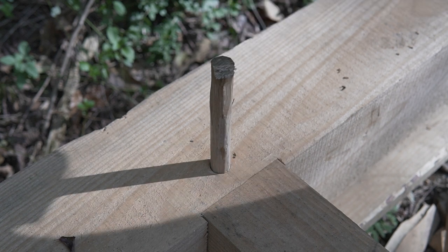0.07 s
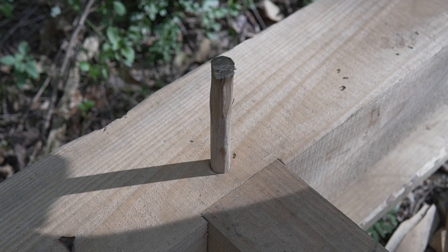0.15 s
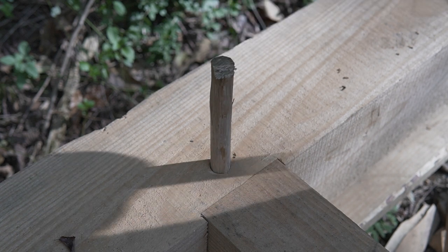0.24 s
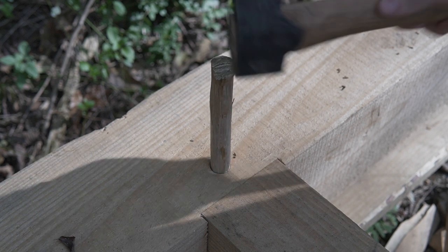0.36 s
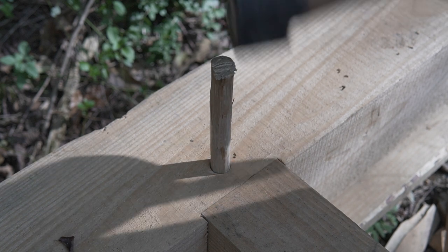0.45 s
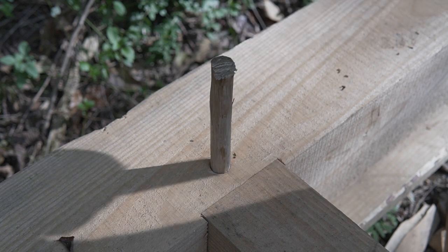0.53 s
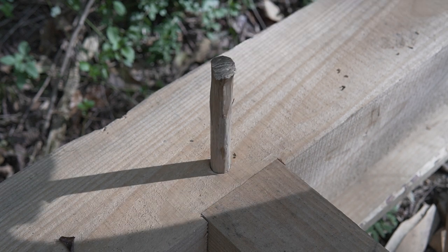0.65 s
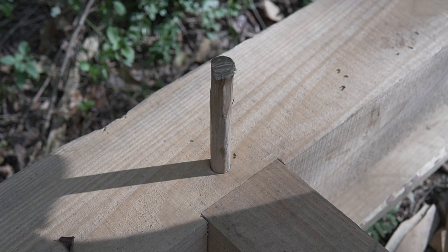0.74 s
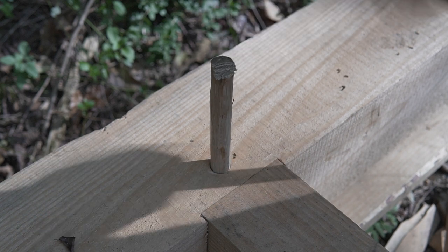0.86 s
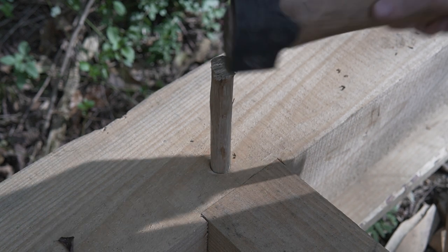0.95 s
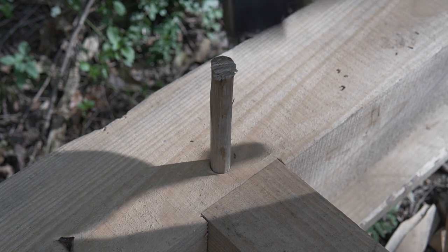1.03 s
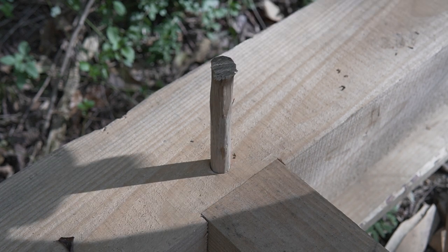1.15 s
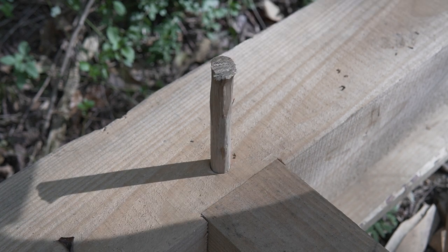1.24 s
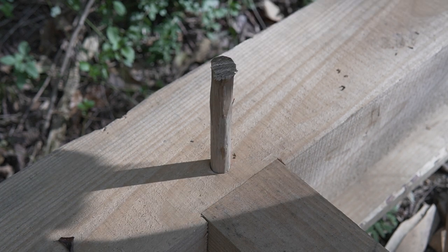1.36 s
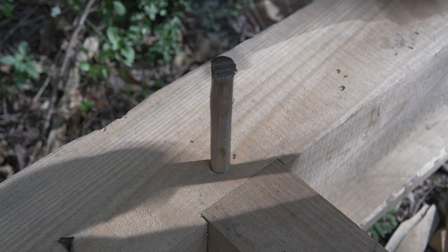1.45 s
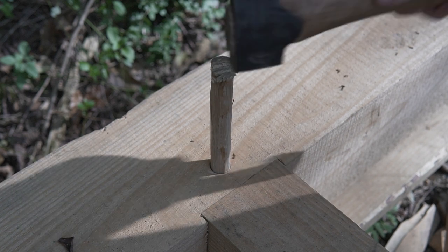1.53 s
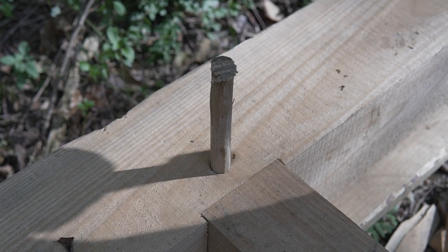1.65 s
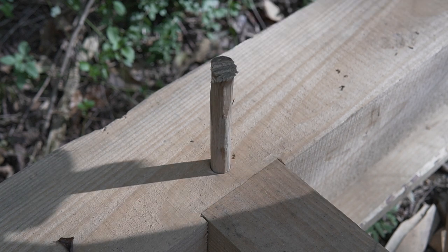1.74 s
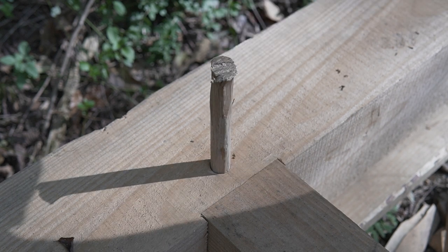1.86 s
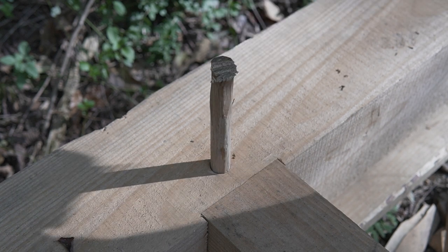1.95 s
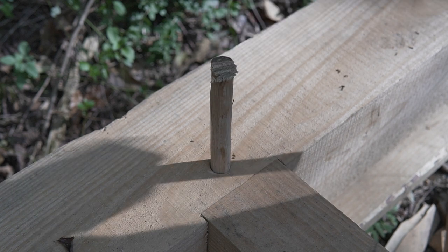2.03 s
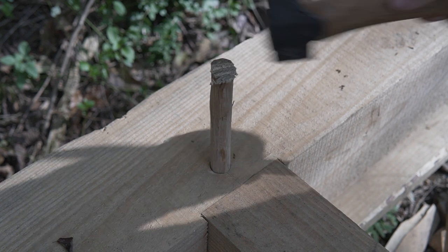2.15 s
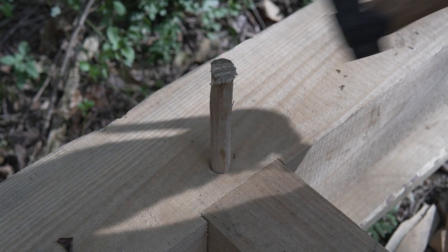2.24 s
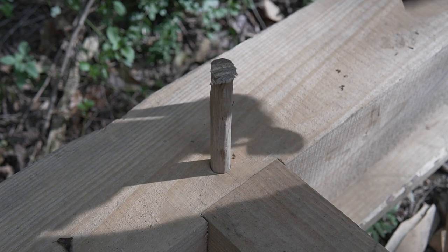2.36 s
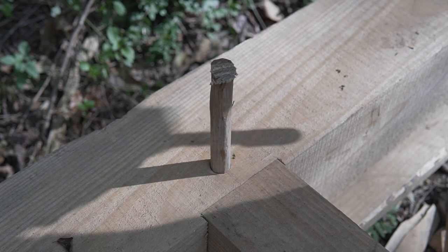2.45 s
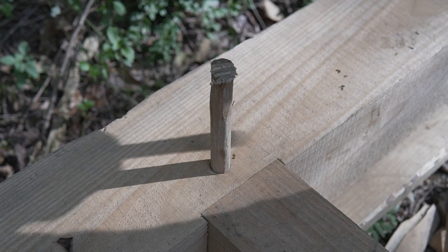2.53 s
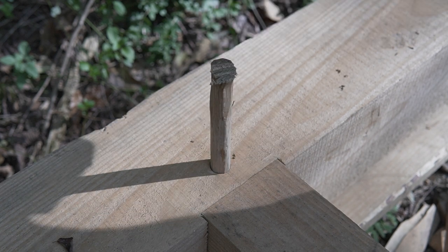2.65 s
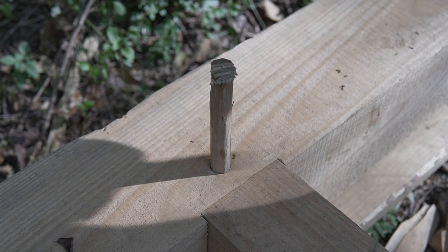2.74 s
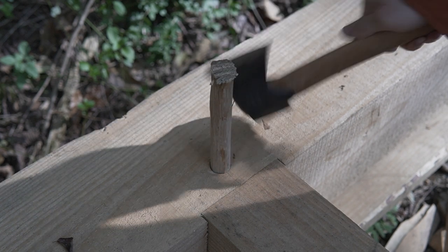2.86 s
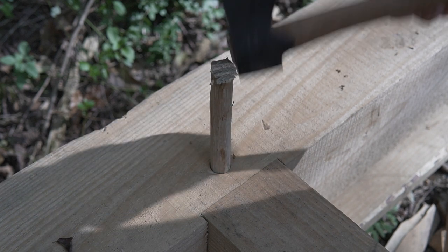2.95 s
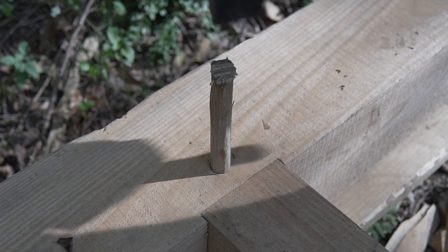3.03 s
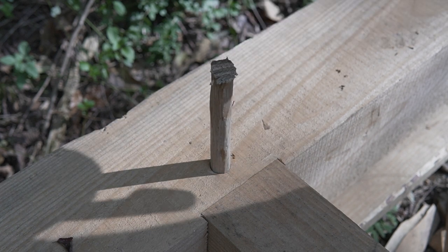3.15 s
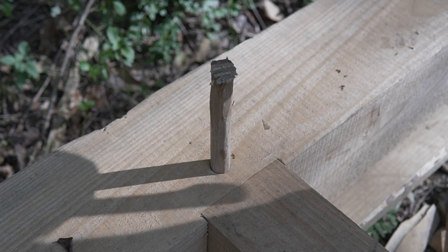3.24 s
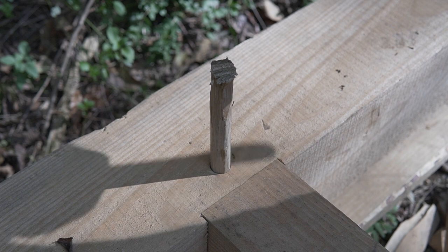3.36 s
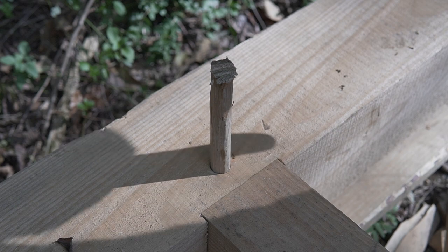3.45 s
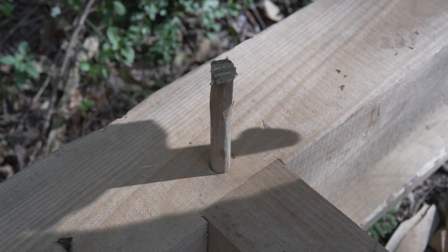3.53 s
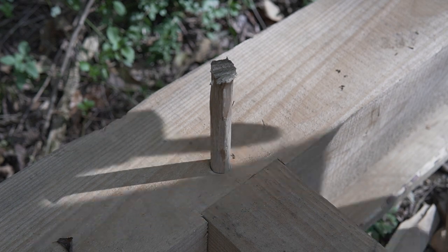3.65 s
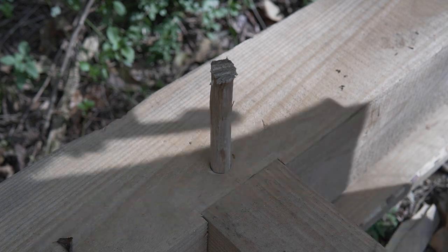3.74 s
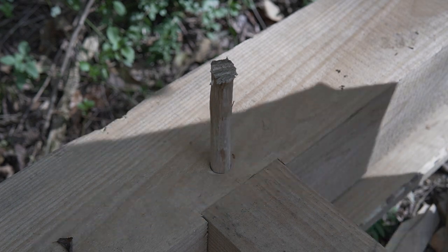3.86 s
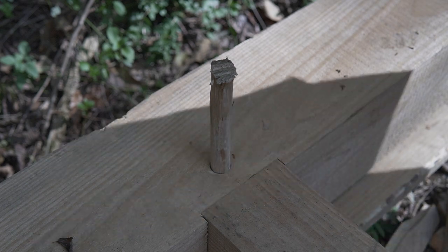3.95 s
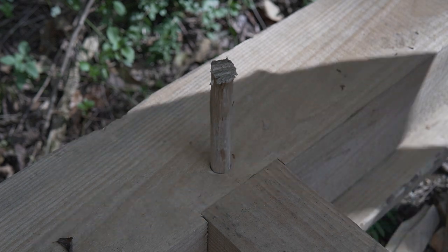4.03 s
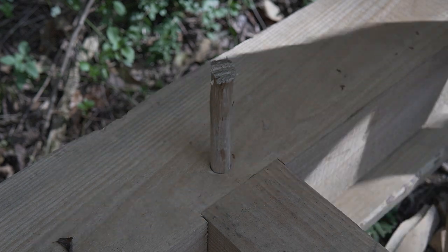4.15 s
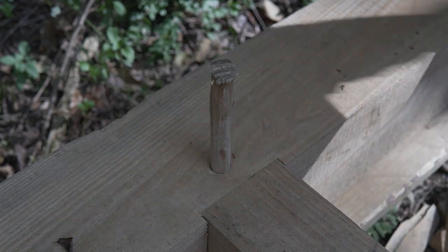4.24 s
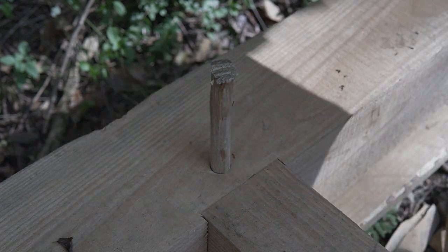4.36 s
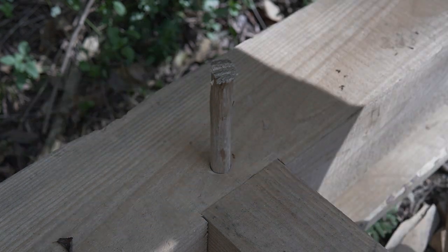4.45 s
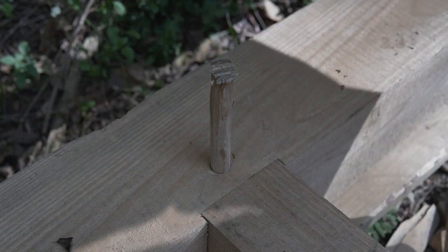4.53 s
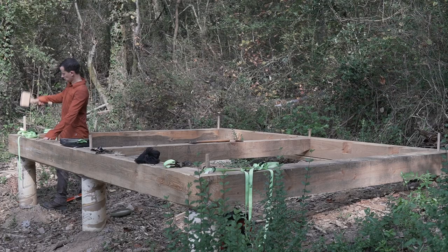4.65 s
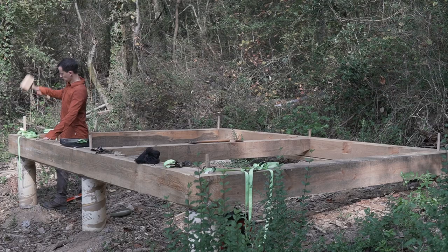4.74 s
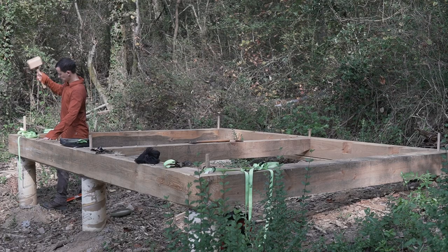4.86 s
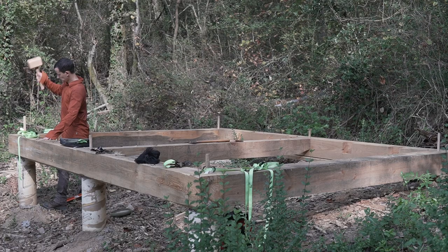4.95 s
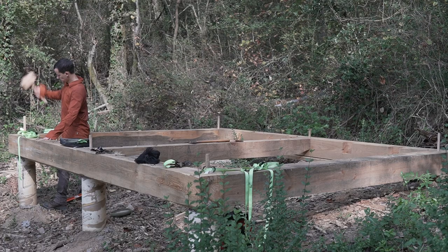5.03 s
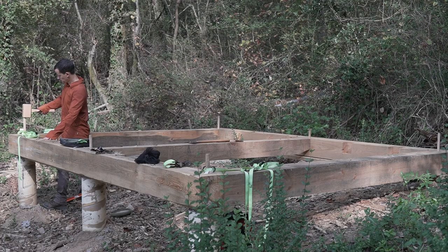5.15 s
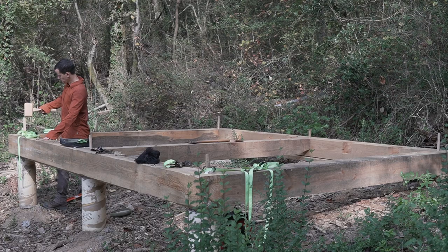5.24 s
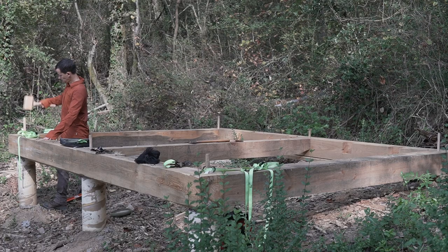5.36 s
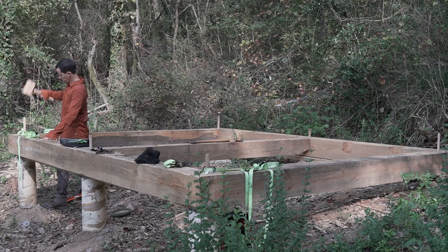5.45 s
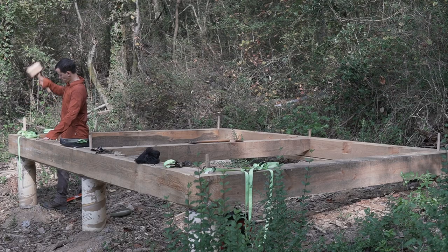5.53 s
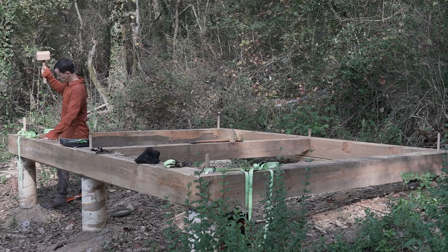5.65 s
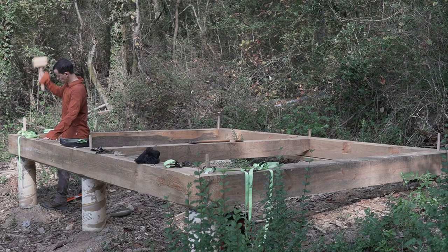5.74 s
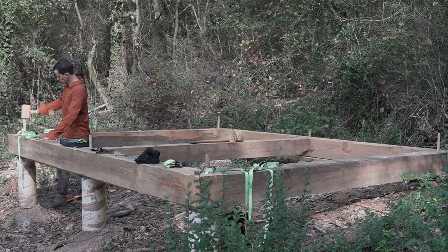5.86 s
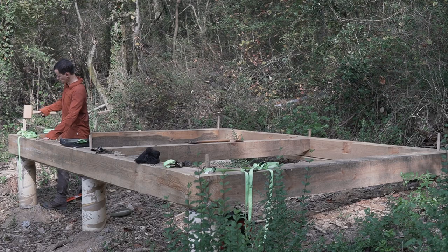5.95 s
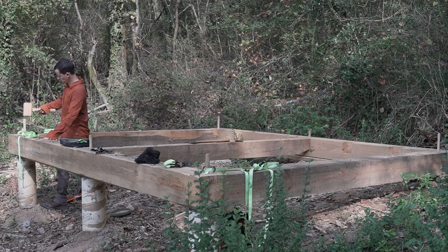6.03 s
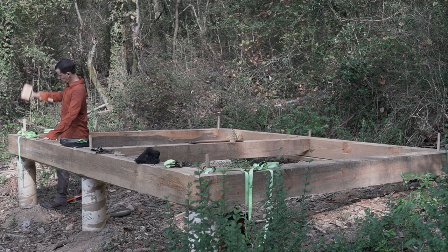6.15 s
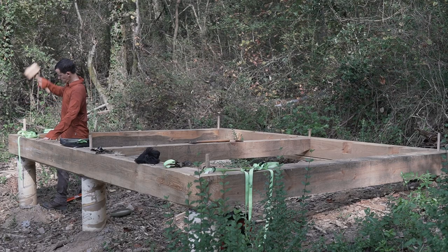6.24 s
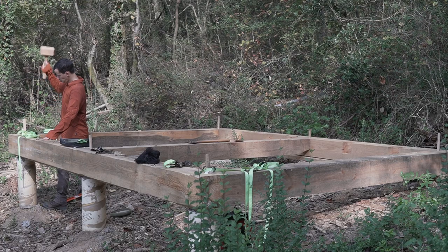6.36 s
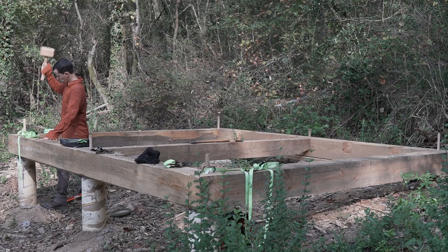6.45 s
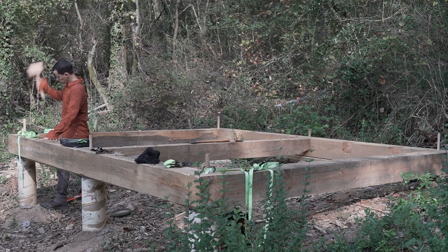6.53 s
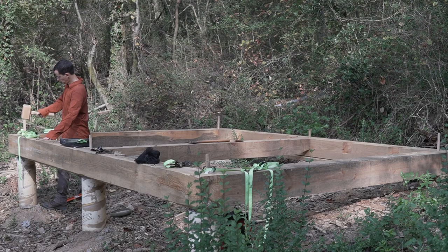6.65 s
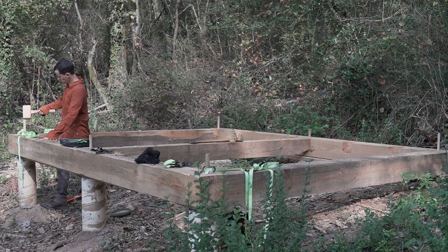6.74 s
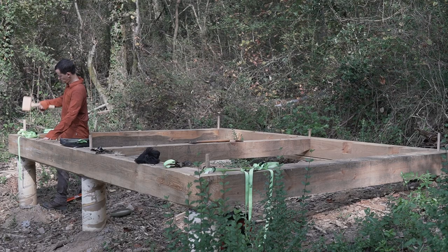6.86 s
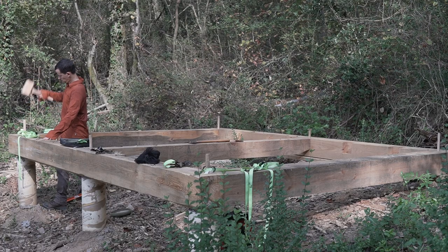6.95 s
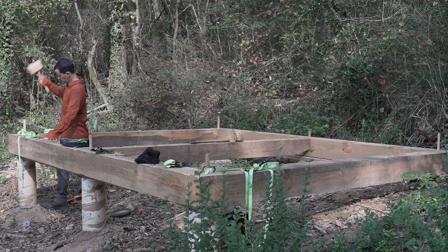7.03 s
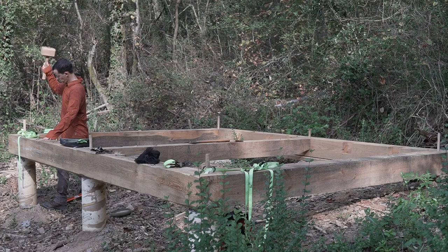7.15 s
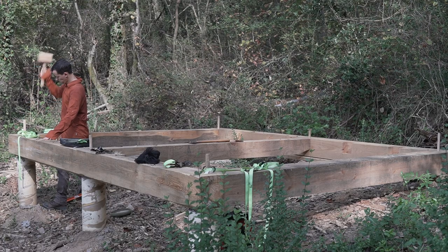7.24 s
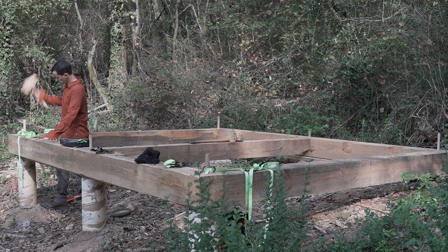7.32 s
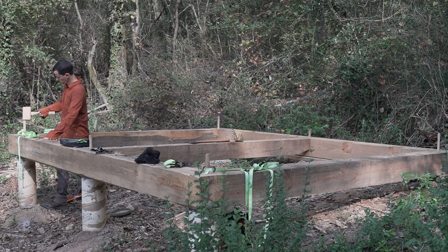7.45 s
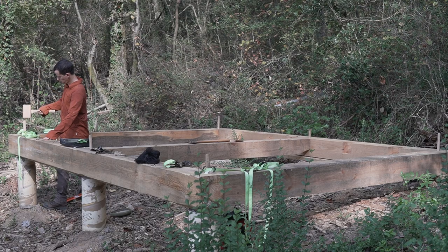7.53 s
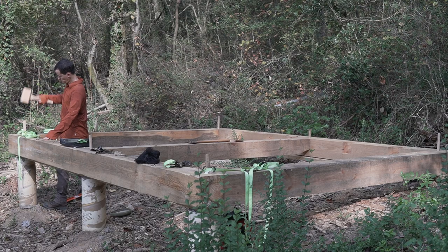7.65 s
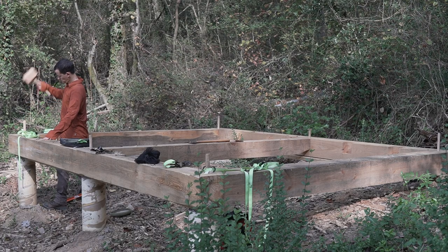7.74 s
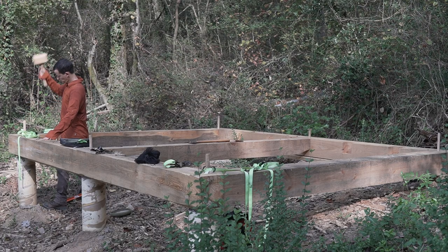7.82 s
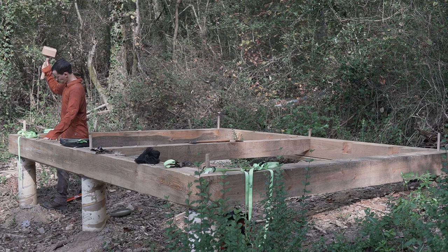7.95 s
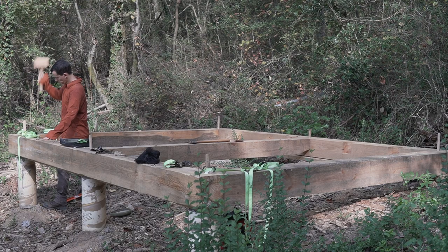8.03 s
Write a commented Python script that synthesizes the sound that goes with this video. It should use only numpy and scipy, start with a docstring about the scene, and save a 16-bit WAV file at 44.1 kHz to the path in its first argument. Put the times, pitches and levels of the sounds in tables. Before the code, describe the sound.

A mallet drives a wooden peg into a timber frame in the woods. Five loud blows land right by the microphone, each a sharp crack with a hollow boom from the beams and a short echo off the trees. Feet shift softly in dry leaves and snap a few twigs. Four more blows follow, slower and heard from across the site. Faint insects, soft air and a barely audible bird lie behind.

```python
"""A mallet drives a wooden peg into a timber frame in a wood: five blows right by the microphone,
then four from across the site. Each blow cracks, rings the peg or the mallet head, booms through
the beams and scatters back from the trees. The close blows overload the recorder and its limiter
ducks them. Between the two groups, feet shift in dry leaves; a bird, insects and air lie far behind."""
import sys
import numpy as np
from scipy import signal
from scipy.fft import rfft, irfft
from scipy.io import wavfile

SR = 44100
rng = np.random.default_rng(int(sys.argv[2]) if len(sys.argv) > 2 else 0)


def put_to_file(sound):
    """Save the sound as 16-bit audio at rate SR, in the file named by the first command-line argument."""
    columns = np.atleast_2d(sound).T  # one column per channel
    safe = np.clip(columns, -1, 1)
    whole_steps = np.round(safe * 32767)
    wavfile.write(sys.argv[1], SR, whole_steps.astype(np.int16))


N = 356769

# blows right by the microphone; the first falls before the start and only rings on:
# t/s, crack level/dB, peg level/dB, favoured peg f/Hz, beam level/dB, favoured beam f/Hz
NEAR_BLOWS = [(-0.27, 4, -2.5, 2000, 2, 300), (0.3372, -5, 1.5, 1131, 2, 307),
              (0.9226, -3, -11.5, 400, 3, 298.3), (1.4975, -8, -2, 349, 3.5, 298),
              (2.0911, 1, -0.5, 2914, 2, 272), (2.8615, -5.5, -3, 2710, -9.5, 338.5)]
# echo bands of the trees, heard from beside the peg: f/Hz, level/dB, t60/s
NEAR_ECHO_BANDS = [(100, -20.5, 1), (450, -14.5, 0.53), (1020, -22, 0.98), (2060, -16.5, 0.71),
                   (3400, -11.5, 0.68), (4870, -11, 0.65), (8000, -13, 0.38), (15000, -9, 0.12)]
def close_blows(echo_db=1, late_s=0.23):
    """At the microphone the mallet hits the peg, the beam under it booms and the wood answers."""
    out = np.zeros(N)
    for s, crack_db, peg_db, peg_hz, beam_db, beam_hz in NEAR_BLOWS:
        strike = peg_strike(crack_db, peg_db, peg_hz)
        beam = beam_boom(beam_hz, favour_db=5.5, octaves=0.18)
        echo = trees(strike, NEAR_ECHO_BANDS, rise_s=0.029, early_db=12, early_s=.09, patchy_db=0.73)
        add(out, s, strike)
        add(out, s, gain_of(beam_db) * swell(beam, rise_s=0.0011))
        add(out, s, gain_of(echo_db) * echo)
        add(out, s + late_s, late_echo(strike))
    return out


# the peg close up, its modes and the bands of its crack: f/Hz, level/dB, t60/s
PEG_MODES = [(299, 1, 0.075), (516, -1.5, 0.028), (899, 1.5, 0.038), (1179, 3, .04), (1158, 2, 0.052),
             (1360, -2.5, 0.017), (1480, 4, 0.014), (1860, 4.5, 0.015), (2157, 1.5, .03),
             (2640, 1.5, 0.0099), (3090, -4.5, 0.005)]
CRACK_BANDS = [(201, 9, 0.19), (625, 16.5, 0.11), (1210, 15.5, 0.064), (2200, 16.5, 0.037),
               (3250, 20.5, 0.042), (4444, 6, .03), (8500, 3.5, 0.016), (15000, -8.5, 0.012)]
def peg_strike(crack_db, peg_db, peg_hz, even_db=-3, tilt_per_db=0.58, dullest_tilt=-2.2):
    """The peg cracks and rings for an instant; a harder crack is brighter."""
    tilt = max(tilt_per_db * (crack_db - even_db), dullest_tilt)  # dB/octave
    strike = gain_of(peg_db) * timber(PEG_MODES, peg_hz, favour_db=7, octaves=.3)
    add(strike, 0, gain_of(crack_db) * burst(CRACK_BANDS, tilt))
    return strike


# the beam close up, its modes and the bands of its rattle: f/Hz, level/dB, t60/s
BEAM_MODES = [(24, -26, 1.3), (37.7, -40, 2.6), (73, -26.5, 0.41), (106, -26.5, 0.18), (142, -19.5, 0.32),
              (183, -18.5, 0.2), (223.8, -11.5, .3), (256.4, -14.5, 0.22), (284.7, -8.5, 0.17),
              (307.6, -11, .28), (372, -8.5, 0.16), (480, -17, 0.17), (583, -16.5, 0.18),
              (632, -15.5, 0.16), (915, -18, 0.12), (1145, -15.5, 0.13)]
BEAM_BANDS = [(60, -6, 0.21), (170, 2, 0.17), (322, 4, 0.33), (590, -1.5, 0.064), (1212.5, -6.5, 0.083),
              (2500, -17, 0.14), (9000, -47.5, .05)]
def beam_boom(favoured_hz, favour_db, octaves, rattle_db=0):
    """The beam under the peg booms and sways in its low modes, with a dense rattle on top."""
    beam = timber(BEAM_MODES, favoured_hz, favour_db, octaves)
    add(beam, 0, gain_of(rattle_db) * burst(BEAM_BANDS))
    return beam


# the mallet's drop by the microphone: t/s, click level/dB, beam level/dB, favoured beam f/Hz
MALLET_DROP = (2.8949, -24, -2.5, 374)
# modes of its dull knock: f/Hz, level/dB, t60/s
KNOCK_MODES = [(338, -8, .045), (600, -17, .05), (1180, -10.5, .04)]
def rebound():
    """After the last close blow the mallet falls back: a faint click, a knock and the beam again."""
    s, click_db, beam_db, beam_hz = MALLET_DROP
    out = np.zeros(N)
    beam = beam_boom(beam_hz, favour_db=8.5, octaves=.2, rattle_db=-2)
    add(out, s, gain_of(click_db) * burst(CRACK_BANDS))
    add(out, s, swell(ring(KNOCK_MODES), rise_s=.001))
    add(out, s, gain_of(beam_db) * swell(beam, rise_s=.0012))
    return out


# blows from across the site: t/s, mallet level/dB, peg f/Hz, peg level/dB, favoured frame f/Hz
DISTANT_BLOWS = [(5.1420, -11, 1272, 1, 224), (5.9072, 2, 1736, -10, 253), (6.6610, 4, 1750, -8.5, 293),
                 (7.4225, 5, 1914, -3.5, 334.7)]
# mallet head, peg snap, frame and tree echoes at that distance: f/Hz, level/dB, t60/s
MALLET_MODES = [(632, -22, 0.055), (1219, -8.5, 0.031), (1468, -12.5, 0.024), (1642, -21.5, 0.063),
                (2040, -11.5, .05), (3000, -33, .04), (3100, -20.5, 0.031)]
SNAP_BANDS = [(200, -9, 0.083), (720, -5, 0.073), (1517, 11, 0.015), (3050, 0.5, 0.021),
              (5640, -6.5, 0.015), (9030, -15.5, 0.0084), (15000, -22.5, 0.0032)]
FRAME_MODES = [(59.4, -29.5, 0.42), (75.4, -20.5, 0.37), (104.1, -23, 0.4), (143, -19.5, 0.2),
               (162.4, -22, 0.27), (219, -28.5, 0.33), (254.4, -16.5, 0.22), (295.3, -28, 0.46),
               (326.1, -23.5, 0.32), (401, -30.5, 0.075), (624, -18.5, 0.16), (804, -27, 0.14)]
FRAME_BANDS = [(47, -5, 0.075), (149, 7, 0.23), (320, 10, 0.15), (602, 0, 0.14), (1200, -1, 0.14),
               (3050, 9.5, 0.055), (9000, -21, 0.034)]
DISTANT_ECHO_BANDS = [(98.5, 17.5, 0.4), (500, -1.5, 0.76), (981, -7, 0.98), (1730, -7, 0.93),
                      (3360, 4, 0.8), (5510, 3, 0.69), (9030, 2, 0.57), (15000, 6, 0.32)]
def far_blows(snap_delay_s=.0075, snap_db=1.58, frame_follows=0.096, echo_follows=0.2):
    """Mallet head and peg ring, the peg snaps forward, and the thud spreads through the frame."""
    out = np.zeros(N)
    for s, mallet_db, peg_hz, peg_db, favoured_hz in DISTANT_BLOWS:
        head = gain_of(mallet_db) * ring(MALLET_MODES)
        peg = ring([(peg_hz, peg_db, 0.06)])
        overtone = ring([(2.7 * peg_hz, peg_db - 9, 0.015)])
        strike = swell(head + peg, rise_s=0.0017)
        add(strike, snap_delay_s, gain_of(snap_db) * burst(SNAP_BANDS) + overtone)
        frame = timber(FRAME_MODES, favoured_hz, favour_db=9.5, octaves=.1)
        add(frame, 0, burst(FRAME_BANDS))
        add(out, s, strike)
        add(out, s, gain_of(mallet_db - 26) * burst(SNAP_BANDS, tilt=-2))  # the faces first touch
        echo = trees(strike, DISTANT_ECHO_BANDS, rise_s=0.0065, early_db=8, early_s=0.1, patchy_db=0.47)
        # thud and echo grow with the mallet's force
        add(out, s, gain_of(frame_follows * mallet_db) * swell(frame, rise_s=0.018))
        add(out, s, gain_of(echo_follows * mallet_db) * echo)
    return out


def trees(x, bands, rise_s, early_db, early_s, patchy_db):
    """Echoes off ground and trunks: strongest from the nearest, then in clumps, gone within a second."""
    t = seconds(SR)
    clumps = np.interp(t, np.linspace(0, 1, 160), rng.standard_normal(160))
    echoes = irfft(rfft(burst(bands)) * spread(x), SR) / np.sqrt(SR)
    level_db = early_db * np.exp(-t / early_s) + patchy_db * clumps
    fade = np.minimum(10 * (1 - t), 1)
    return swell(echoes, rise_s) * gain_of(level_db) * fade


def late_echo(x, db=-40, hz=620, width_hz=70):
    """One dull, smeared return from far off in the wood."""
    band = bell(np.arange(SR // 2 + 1), hz, width_hz)
    smear = np.hanning(2400) * rng.standard_normal(2400) / np.sqrt(900)
    return gain_of(db) * irfft(rfft(x, SR) * band * rfft(smear, SR), SR)


# steps on the woodland floor: peak t/s, level/dB, rise/s
FOOTSTEPS = [(3.235, -56, 0.048), (3.477, -49, 0.033), (3.678, -34.5, 0.0065), (3.778, -51.5, 0.012),
             (3.96, -48.5, 0.0053), (4.108, -46, 0.037), (4.585, -51, 0.011)]
# twigs snapping underfoot: t/s, level/dB
TWIG_SNAPS = [(3.2320, -32.5), (3.3724, -28.5), (3.7013, -26.5), (4.576, -35), (4.6979, -33)]
# dull footfalls and bumps: t/s, level/dB, f/Hz, t60/s
FOOTFALLS = [(3.672, -34, 83.5, 0.058), (3.951, -23.5, 73, 0.056), (4.606, -29.5, 324, 0.097)]
# spectrum of dry leaves at the microphone: f/Hz, level/dB
LEAF_SPECTRUM = [(100, 2), (400, 8), (1000, 0), (3000, 2.5), (6000, -5), (10000, -11), (16000, -19.5)]
def feet(grain_db=6.5, ticks_per_step=2, tick_spread_s=0.036, tick_db=-42.5, contact_db=-33):
    """Leaves crackle in grains under each step; twigs tick and weight lands dully."""
    pressure = sum(tread(*step) for step in FOOTSTEPS)
    grain_starts = np.arange(0, N, 40)
    grains = rng.standard_normal(len(grain_starts)).clip(-2, 2.3)
    crackle = rng.standard_normal(N) * gain_of(grain_db * np.interp(np.arange(N), grain_starts, grains))
    out = colour(crackle * pressure, LEAF_SPECTRUM) / np.std(colour(crackle, LEAF_SPECTRUM))
    for s, _, _ in FOOTSTEPS:
        for offset in rng.standard_normal(ticks_per_step):
            add(out, s + tick_spread_s * offset, tick(tick_db))
    for s, db in TWIG_SNAPS:
        add(out, s, tick(db))
    for s, db, hz, t60 in FOOTFALLS:
        add(out, s, tick(contact_db))
        add(out, s, swell(ring([(hz, db, t60)]), rise_s=0.0019))
    return out


def tread(s, db, rise_s, lift_s=0.015, settle_db=-17.5, settle_s=0.085):
    """Pressure of one step: it builds, the foot lifts quickly, then the leaves settle more softly."""
    t = seconds(N) - s
    before, after = np.maximum(-t, 0), np.maximum(t, 0)
    release = np.exp(-after / lift_s) + gain_of(settle_db) * np.exp(-after / settle_s)
    return gain_of(db) * np.exp(-before / rise_s) * release


def tick(db, decay_s=0.00081):
    """A dry twig or leaf stalk breaks."""
    noise = colour(rng.standard_normal(2048), LEAF_SPECTRUM)
    return gain_of(db) * noise * np.exp(-seconds(2048) / decay_s)


# a bird, faint at the microphone: t/s, length/s, f/Hz, level/dB
BIRD_NOTES = [(1.955, .13, 3550, -52), (6.58, .03, 3500, -59)]
def bird(waver_hz=30, glide_hz=140):
    """Short whistled notes that waver as they rise."""
    out = np.zeros(N)
    for s, length, pitch_hz, db in BIRD_NOTES:
        count = round(length * SR)
        waver = np.interp(np.linspace(0, 1, count), np.linspace(0, 1, 12), rng.standard_normal(12))
        note_hz = pitch_hz + waver_hz * waver + glide_hz * np.linspace(-.5, .5, count)
        add(out, s, gain_of(db) * np.hanning(count) * np.sin(2 * np.pi * np.cumsum(note_hz) / SR))
    return out


# insect choruses, heard beside the peg and across the site: f/Hz, width/Hz, level/dB per Hz
NEAR_CHORUSES = [(3380, 370, -102), (6830, 270, -104), (7460, 420, -104)]
DISTANT_CHORUSES = [(3310, 320, -102), (6720, 280, -101), (7330, 420, -105)]
def insects():
    """Countless insects merge into a few steady bands at each place."""
    buzz, hz = rfft(white_noise()), np.fft.rfftfreq(N, 1 / SR)
    places = []
    for choruses in NEAR_CHORUSES, DISTANT_CHORUSES:
        spectrum = sum(gain_of(db) * bell(hz, centre, width) for centre, width, db in choruses)
        places.append(irfft(buzz * spectrum, N))
    return change_place(*places)


# air among the trees, beside the peg and across the site: f/Hz, level/dB per Hz
NEAR_AIR = [(25, -75), (100, -79), (200, -83), (400, -94), (1000, -96.5), (2000, -102), (3400, -102),
            (5000, -110), (10000, -116), (16000, -118)]
DISTANT_AIR = [(25, -75.5), (100, -75.5), (200, -83.5), (400, -89.5), (1000, -92.5), (2000, -101),
               (3400, -104), (5000, -112), (10000, -117), (16000, -118)]
def air():
    """Softly moving air: a low rumble under a faint hiss."""
    return change_place(colour(white_noise(), NEAR_AIR), colour(white_noise(), DISTANT_AIR))


def change_place(near, distant, move_s=4.6):
    """The background switches from the microphone's place by the peg to the one across the site."""
    return np.where(seconds(N) < move_s, near, distant)


def timber(modes, favoured_hz, favour_db, octaves):
    """Modes of a piece of wood; the spot where the blow lands favours those near one pitch."""
    struck = [(hz, db + favour_db * np.exp(-(np.log2(hz / favoured_hz) / octaves) ** 2), t60)
              for hz, db, t60 in modes]
    return ring(struck, count=2 * SR)


def ring(modes, count=SR):
    """Decaying sines from (f/Hz, level/dB, t60/s) rows; neighbours swing in opposite senses."""
    t = seconds(count)
    return sum((-1) ** k * gain_of(db - 60 * t / t60) * np.sin(2 * np.pi * hz * t)
               for k, (hz, db, t60) in enumerate(modes))


def burst(bands, tilt=0):
    """Countless overlapping modes or echoes: noise, tilted in dB/octave, that dies band by band."""
    t, hz = seconds(SR), np.fft.rfftfreq(SR, 1 / SR)
    centres, dbs, t60s = np.transpose(bands)
    octaves = np.log2(np.maximum(hz, 500) / 2000)
    spectrum = gain_of(read(np.c_[centres, dbs], hz) + tilt * octaves)
    noise, out = rfft(rng.standard_normal(SR)), np.zeros(SR)
    for this_band, t60 in zip(np.eye(len(bands)), t60s):
        band = spectrum * read(np.c_[centres, this_band], hz)
        decay = gain_of(-60 * t / t60)
        part = irfft(noise * band, SR) * decay
        energy = np.mean(band ** 2) * np.sum(decay ** 2)  # each band gets a set share
        out += part * np.sqrt(energy / np.sum(part ** 2))
    return out


def swell(x, rise_s):
    """Lets a sound build up as it spreads."""
    return x * (1 - np.exp(-(seconds(len(x)) / rise_s) ** 2))


def spread(x, octaves=0.1, least_hz=40):
    """The spectrum of x with its fine ripples evened out, as they are over all directions."""
    energy, hz = np.cumsum(abs(rfft(x, SR)) ** 2), np.arange(SR // 2 + 1)
    reach = least_hz + octaves * hz
    nearby = np.interp(hz + reach, hz, energy) - np.interp(hz - reach, hz, energy)
    return np.sqrt(abs(nearby) / (2 * reach))


def colour(x, points):
    """Filters x by an (f/Hz, level/dB) spectrum."""
    hz = np.fft.rfftfreq(len(x), 1 / SR)
    return irfft(rfft(x) * gain_of(read(points, hz)), len(x))


def read(points, hz):
    """Joins (f/Hz, value) points on a log-frequency axis."""
    f, value = np.transpose(points)
    return np.interp(np.log(hz + 1), np.log(f + 1), value)


def add(mix, s, sound):
    """Mixes a sound in at time s, which may lie before the start."""
    at = round(s * SR)
    sound = sound[max(-at, 0):]
    part = mix[max(at, 0):][:len(sound)]
    part += sound[:len(part)]


def white_noise():
    """Noise at 0 dB per Hz."""
    return rng.standard_normal(N) * np.sqrt(SR / 2)


def bell(hz, centre, width):
    return np.exp(-.5 * ((hz - centre) / width) ** 2)


def gain_of(db):
    return 10 ** (np.asarray(db) / 20)


def seconds(count):
    return np.arange(count) / SR


def scene():
    """Blows, steps and the wood around them, at one microphone."""
    return (close_blows() + rebound() + far_blows() + feet() + air() + insects() + bird())[None]


def record(dry, threshold_db=-1, most_db=16, recovery_db_per_s=340, attack_s=.003, edge_hz=16100):
    """A limiter too slow for the close crack, so that it clips and then ducks; then the band limit."""
    over_db = np.clip(20 * np.log10(abs(dry[0]) + 1e-9) - threshold_db, 0, most_db)
    fall_db = seconds(N) * recovery_db_per_s
    held_db = np.maximum.accumulate(over_db + fall_db) - fall_db
    pole = np.exp(-1 / (attack_s * SR))
    duck_db = signal.lfilter([1 - pole], [1, -pole], held_db)
    clipped = np.clip(dry * gain_of(-duck_db), -1, 1)
    lowpass = signal.firwin(161, edge_hz, window=("kaiser", 9), fs=SR)
    return signal.oaconvolve(clipped, lowpass[None], "same")


dry = scene()
out = record(dry)
put_to_file(out)
```